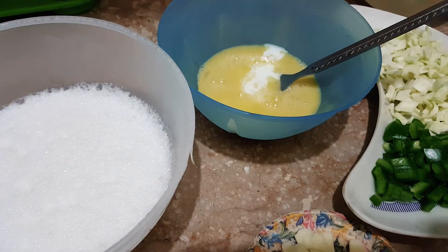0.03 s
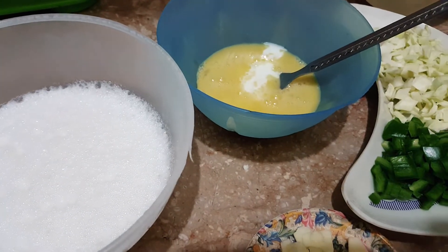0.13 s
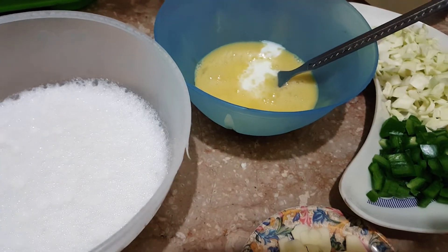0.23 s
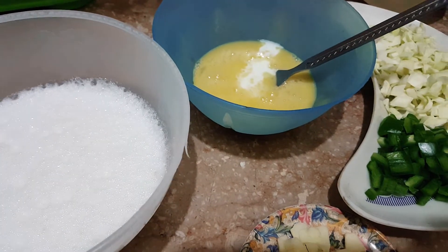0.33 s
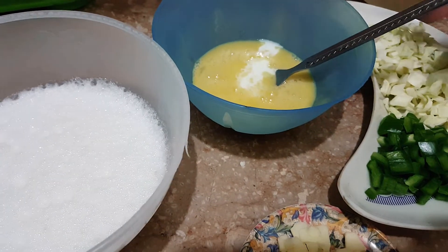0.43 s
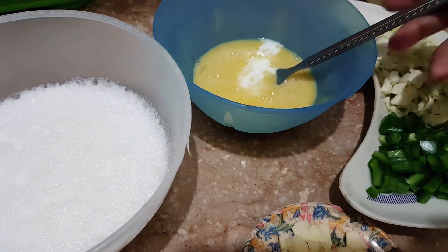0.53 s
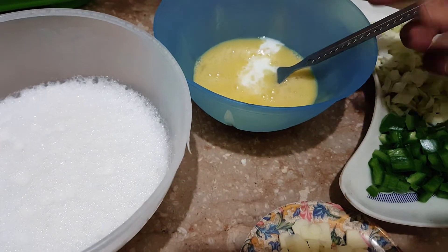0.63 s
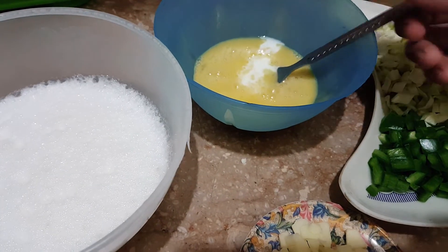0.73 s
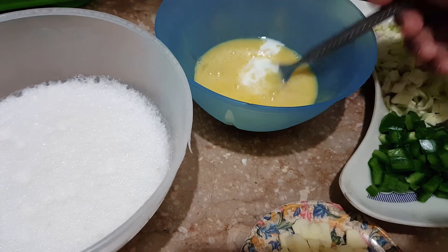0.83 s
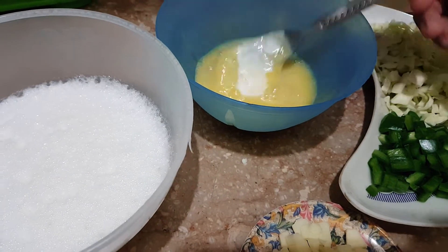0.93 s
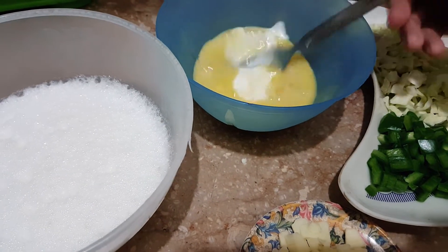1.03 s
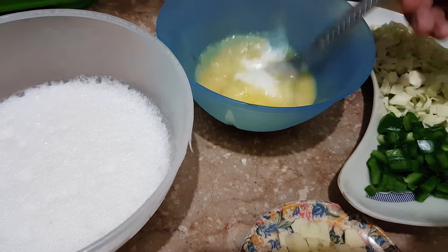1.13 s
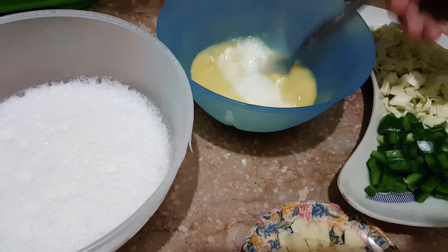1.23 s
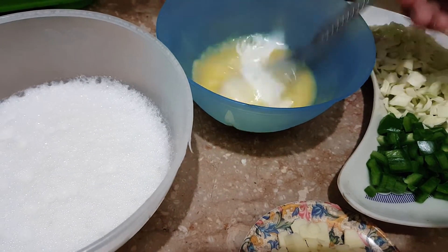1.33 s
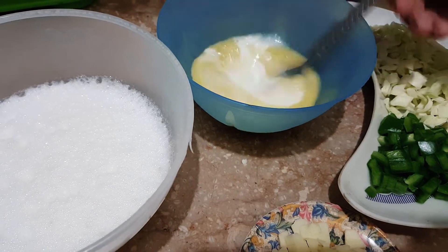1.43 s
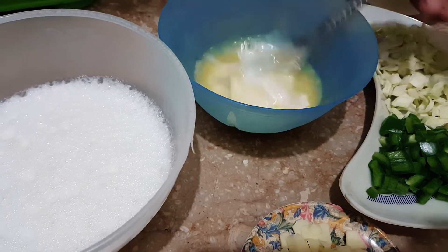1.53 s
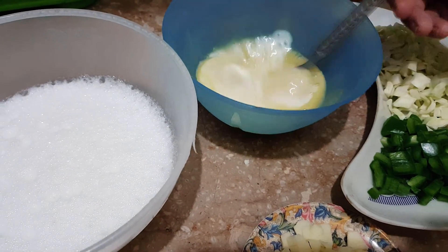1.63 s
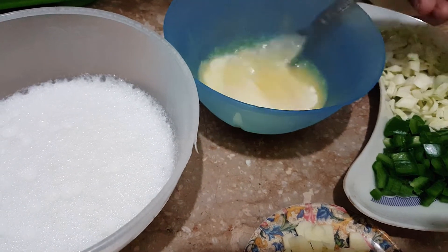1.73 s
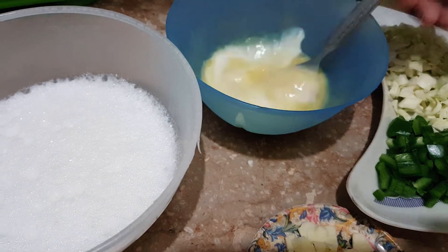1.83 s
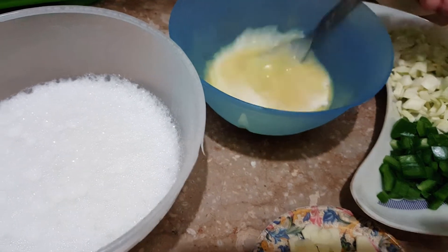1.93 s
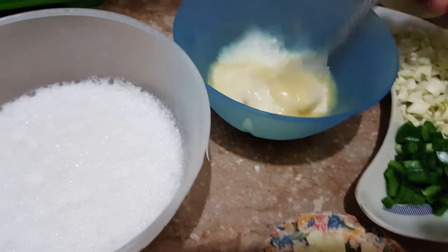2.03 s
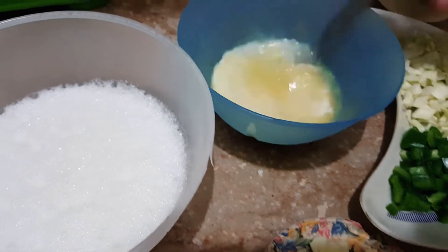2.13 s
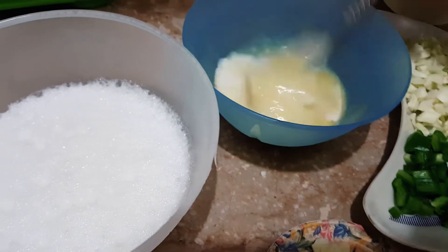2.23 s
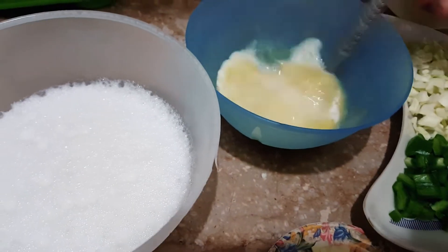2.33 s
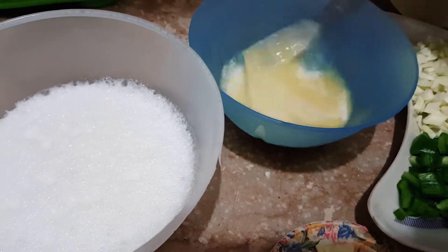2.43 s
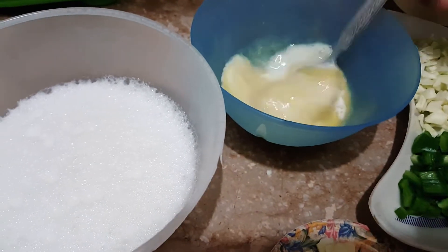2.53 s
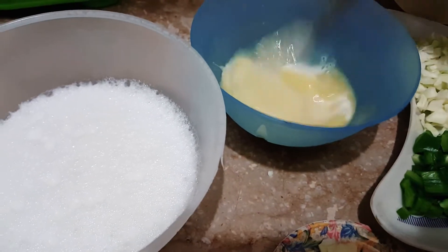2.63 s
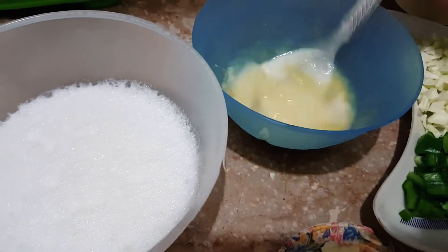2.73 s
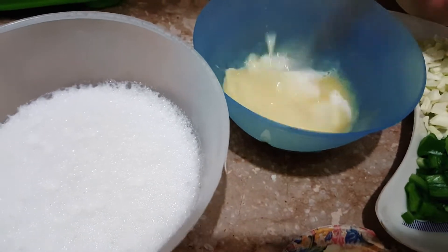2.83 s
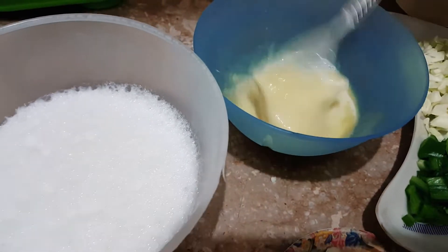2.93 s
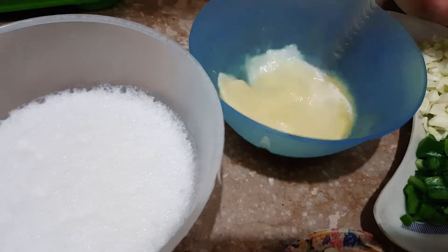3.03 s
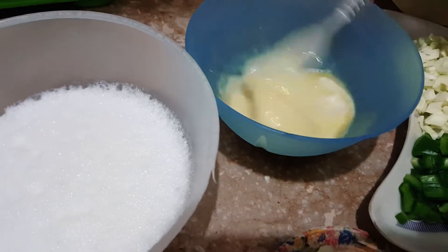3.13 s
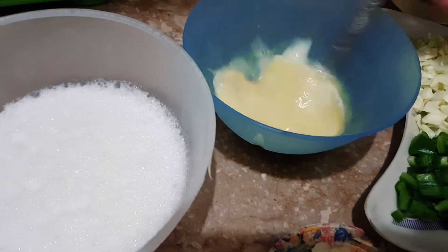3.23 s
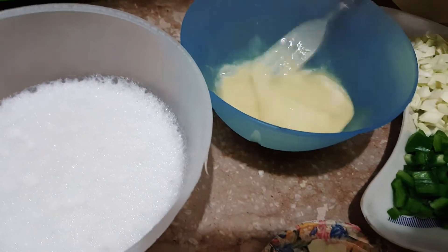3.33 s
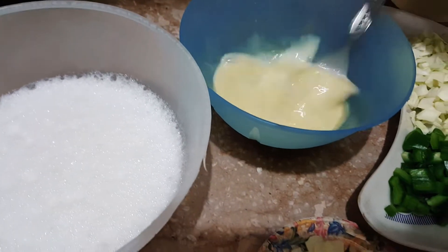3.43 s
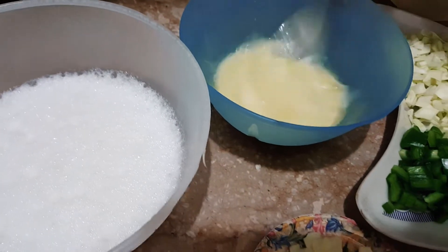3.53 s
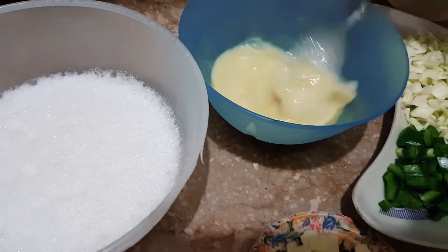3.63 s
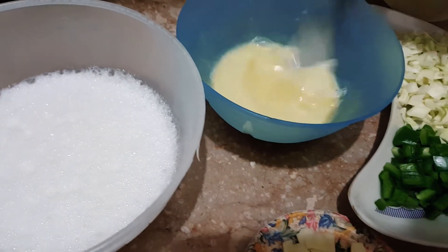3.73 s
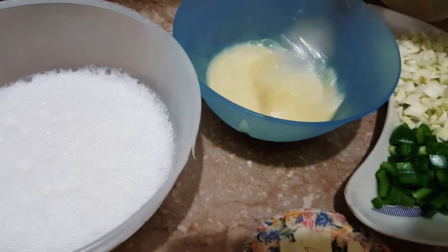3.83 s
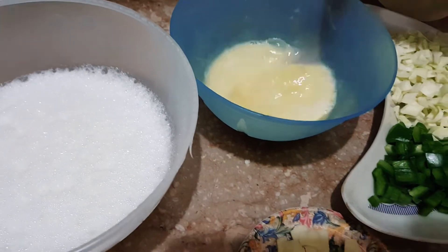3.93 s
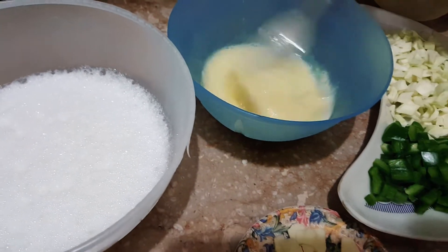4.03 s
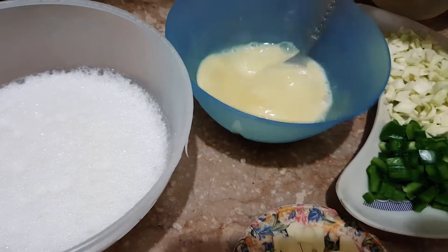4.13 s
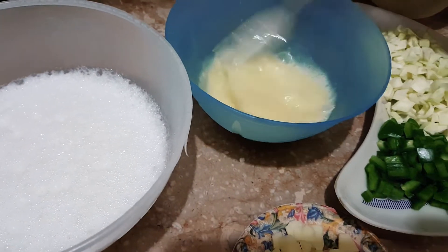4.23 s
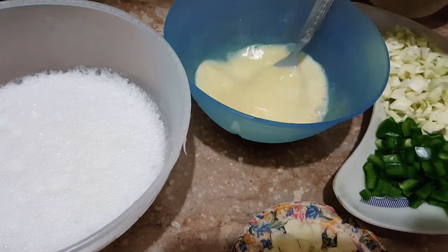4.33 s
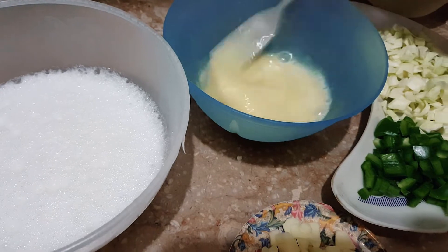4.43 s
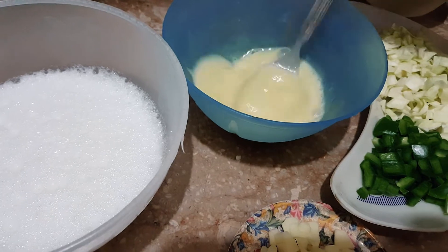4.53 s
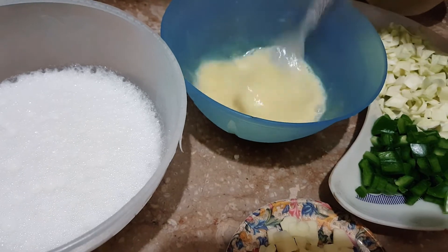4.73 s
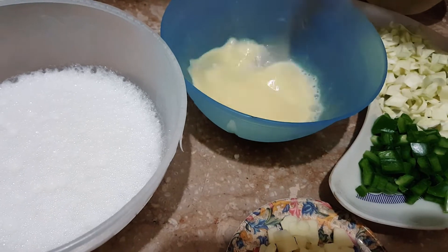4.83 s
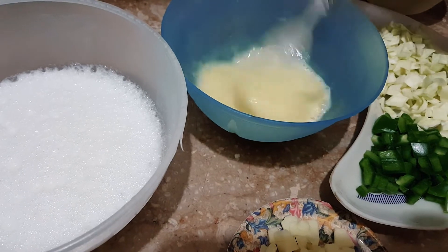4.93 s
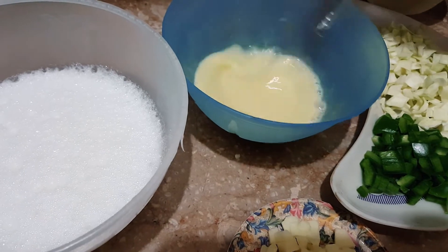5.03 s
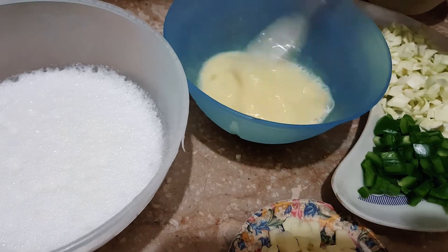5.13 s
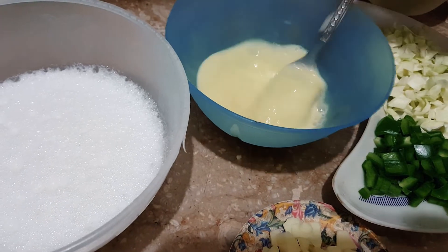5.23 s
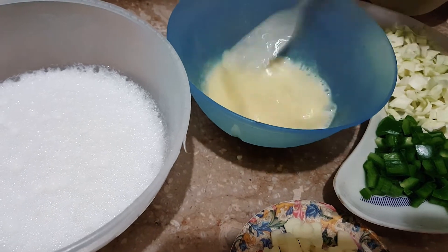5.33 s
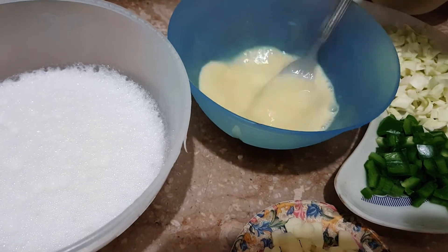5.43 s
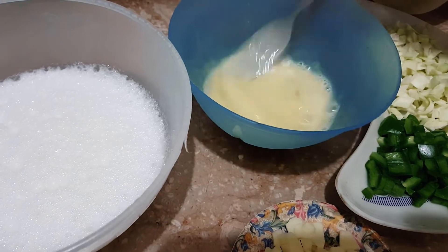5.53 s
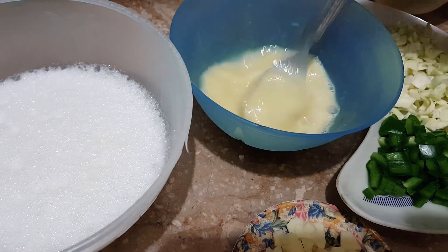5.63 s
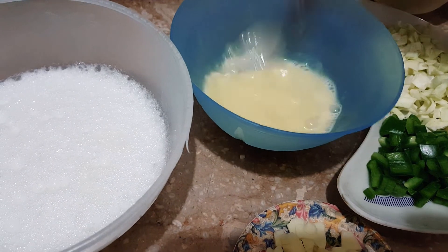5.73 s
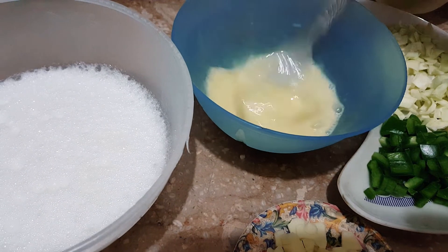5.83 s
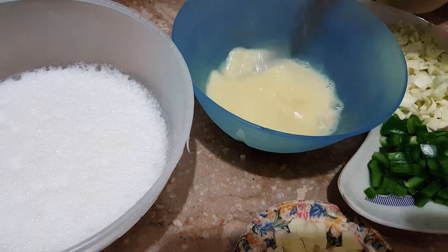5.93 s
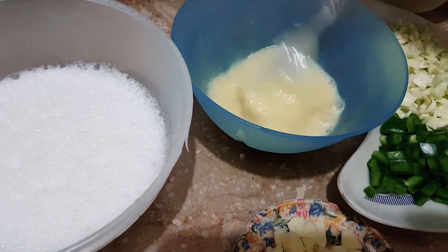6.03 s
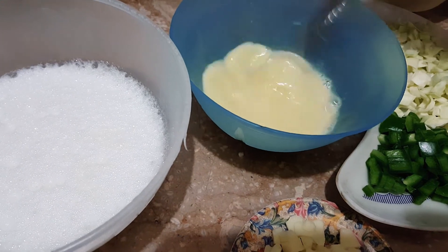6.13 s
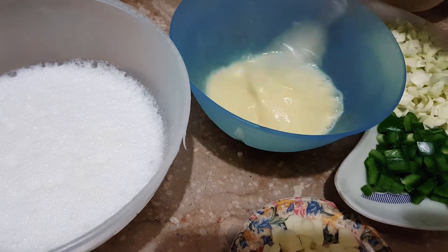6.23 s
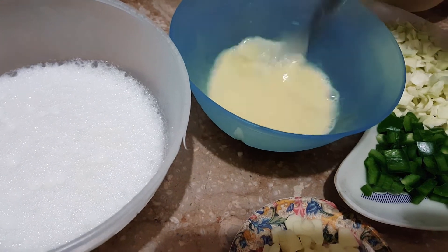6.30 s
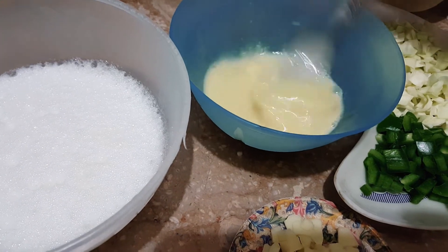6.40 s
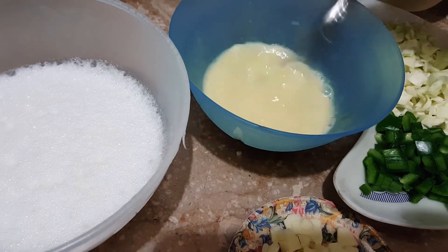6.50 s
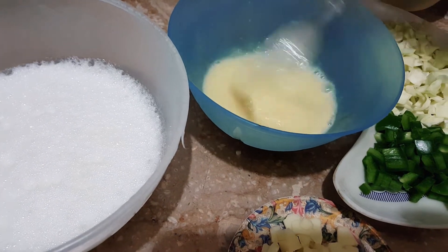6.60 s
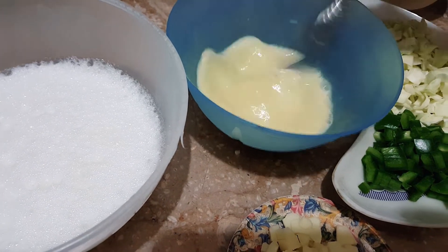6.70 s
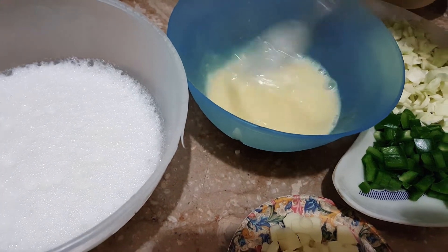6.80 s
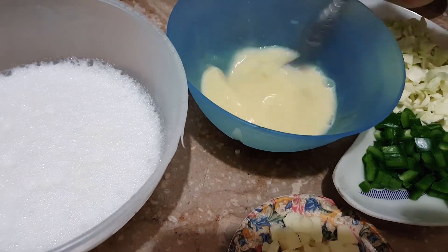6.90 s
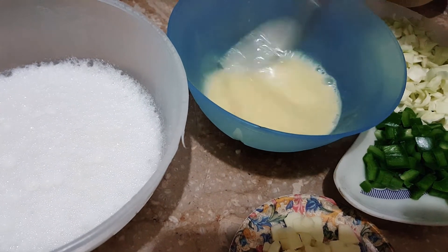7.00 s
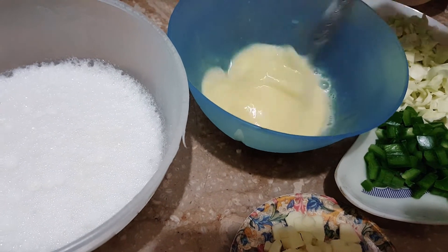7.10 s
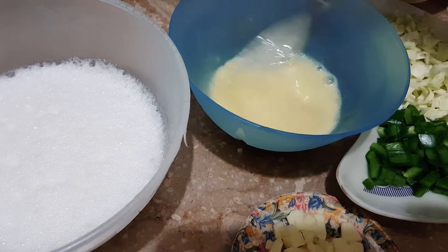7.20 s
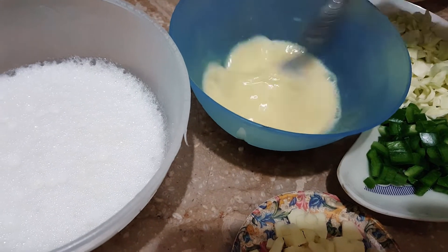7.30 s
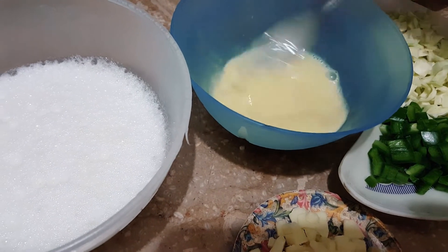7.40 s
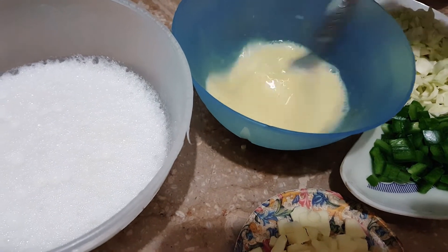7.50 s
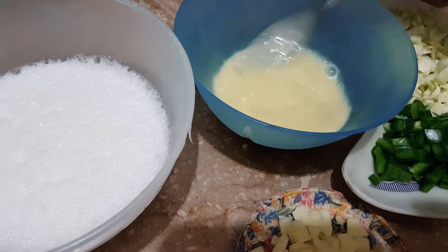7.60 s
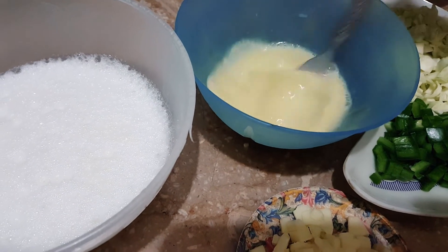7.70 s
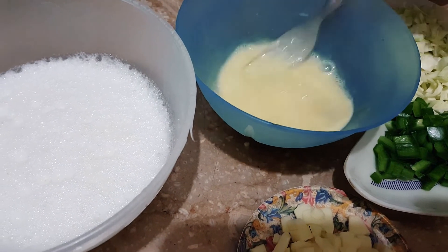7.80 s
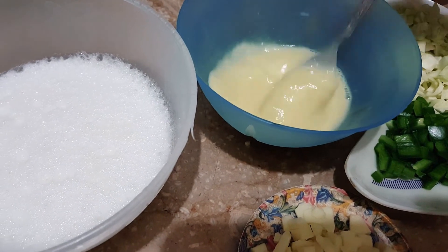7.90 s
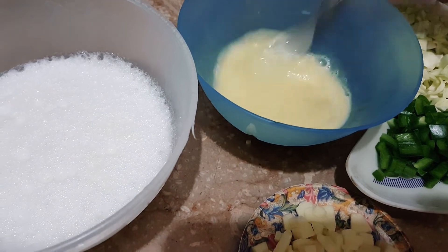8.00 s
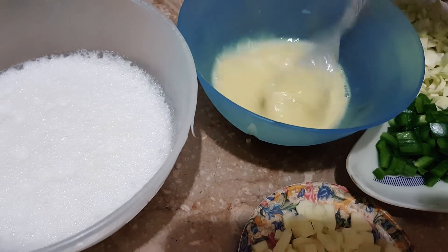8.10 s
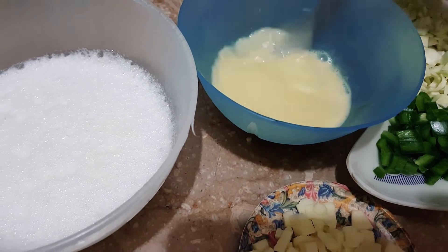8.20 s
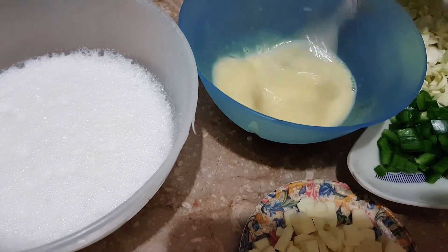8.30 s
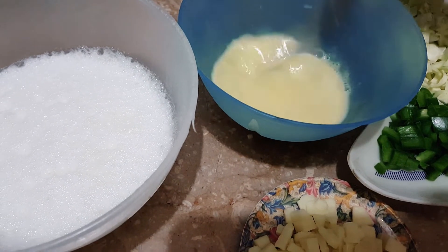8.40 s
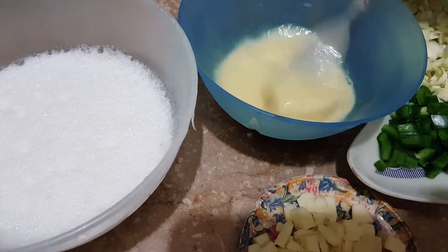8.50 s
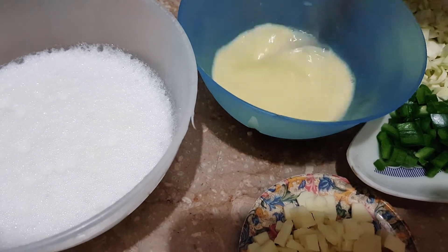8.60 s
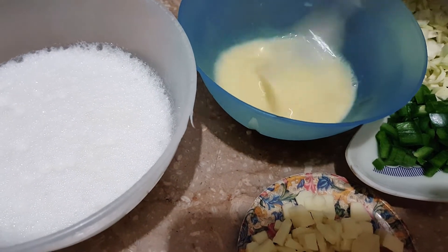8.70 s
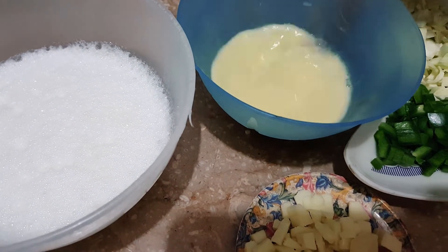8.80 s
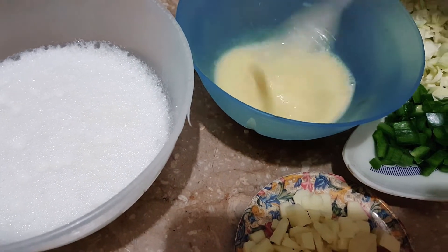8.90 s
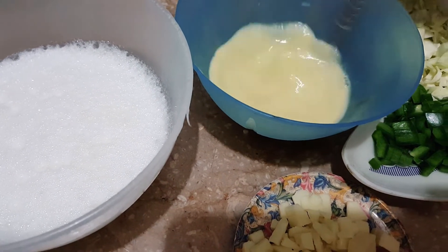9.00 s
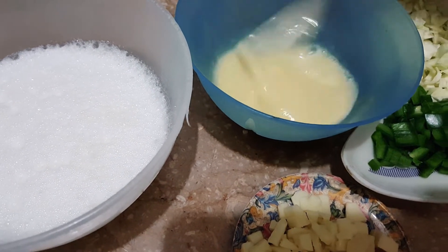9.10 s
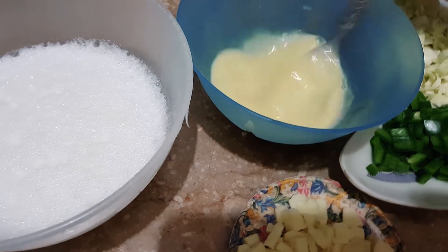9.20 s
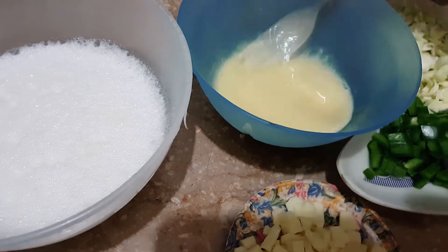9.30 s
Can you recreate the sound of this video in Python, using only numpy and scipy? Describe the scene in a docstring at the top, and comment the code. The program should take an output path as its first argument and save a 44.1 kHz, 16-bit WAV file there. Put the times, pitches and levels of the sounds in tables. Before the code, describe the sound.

Brisk wet whisking of thin batter in a small plastic bowl, with gulping slaps, fork scrapes and fine fizzing froth.

```python
"""Whisking egg and milk with a fork

A fork beats egg and milk in a plastic bowl, five to six strokes a second, close to the microphone.
Each plop is a ringing air pocket with bursts of coloured noise for thud, slap, splash and spray.
Tines cut the liquid or strike the wall, then the hollow gulps shut; froth and swirl are clumped pops.
A dull knock comes before the strokes; the kitchen rings briefly and the loudest plops overload."""
import sys
import numpy as np
from scipy import signal
from scipy.fft import rfft, irfft
from scipy.io import wavfile
from scipy.ndimage import uniform_filter1d

SR = 44100
rng = np.random.default_rng(int(sys.argv[2]) if len(sys.argv) > 2 else 0)


def wav_out(sig):
    """Save sig, one row per channel (or a flat mono array), as 16-bit PCM at SR to the path in sys.argv[1]."""
    wavfile.write(sys.argv[1], SR, np.round(np.clip(np.atleast_2d(sig).T, -1, 1) * 32767).astype(np.int16))


N = 412335  # length [samples]


def amp(db):
    """Decibels to gain."""
    return 10 ** (np.asarray(db) / 20)


def evened(x):
    """Scales to rms 1."""
    return x / np.sqrt(np.mean(x ** 2) + 1e-20)


def unit_blow(x):
    """Scales a short sound to the energy of 10 ms at rms 1."""
    return x / np.sqrt(np.sum(x ** 2) / (SR / 100) + 1e-20)


def read(points, hz):
    """Reads a table on a log-frequency axis."""
    f, value = np.transpose(points)
    return np.interp(np.log(hz + 1), np.log(f + 1), value)


def add(mix, s, sound):
    """Adds a sound into the mix at time s [s]."""
    part = mix[max(round(s * SR), 0):][:len(sound)]
    part += sound[:len(part)]


def coloured(x, spectrum):
    """Filters x by a table of (frequency [Hz], gain [dB])."""
    hz = np.fft.rfftfreq(len(x), 1 / SR)
    return irfft(rfft(x) * amp(read(spectrum, hz)), len(x))


def seconds(size):
    """Time axis [s] of a sound of the given number of samples."""
    return np.arange(size) / SR


def burst(spectrum, rise, decay, grain_db):
    """A short rush of coloured noise in uneven grains; rise and decay are time constants [s]."""
    t = seconds(size=6144)
    grains = amp(grain_db * evened(uniform_filter1d(rng.standard_normal(len(t)), size=30)))
    rush = coloured(rng.standard_normal(len(t)) * grains, spectrum)
    return unit_blow(rush * (1 - np.exp(-t / rise)) * np.exp(-t / decay))


def pocket(hz, rise, cycles, drift, echo, reach, scatter):
    """An air pocket rings for a few cycles as it changes size; others follow from the other tines."""
    t, out = seconds(size=1024), np.zeros(2048)
    later = rng.uniform(0.00145, reach, size=4)  # [s]
    for delay, size in [(0, 1), *zip(later, echo * np.exp(-later / reach))]:
        own_hz = hz * np.exp(scatter * rng.uniform(-0.94, 1) * delay / reach)
        age = own_hz * t / cycles
        pitch = own_hz * np.exp(drift * rng.uniform(-0.94, 1) * (np.tanh(age / 2) - .5))
        tone = np.sin(2 * np.pi * np.cumsum(pitch) / SR)
        add(out, delay, size * tone * (1 - np.exp(-t / rise)) * np.exp(-age))
    return unit_blow(out)


def crackle(level, spectrum, per_s, spread_db, clump_db):
    """Countless small bubbles burst in loose clumps under a slow level curve."""
    sizes = amp(spread_db * np.minimum(rng.exponential(1, N), 4))
    pops = rng.standard_normal(N) * (rng.random(N) < per_s / SR) * sizes
    hz, t, z = signal.stft(coloured(pops, spectrum), SR, nperseg=256)
    # each clump holds bubbles of like size, so it lights a patch of the spectrum
    patches = uniform_filter1d(rng.standard_normal(z.shape), size=14, axis=0)
    clumps = evened(uniform_filter1d(patches, size=12, axis=1))
    fizz = signal.istft(z * amp(clump_db * clumps), SR)[1][:N]
    return evened(fizz) * amp(np.interp(seconds(N), *np.transpose(level)))


# cuts and strikes closer together than this belong to one stroke
STROKE_GAP_S = 0.11


def stroke_starts():
    """The time [s] at which the fork enters the liquid in each stroke."""
    times = np.sort([row[0] for row in CUTS + STRIKES])
    return times[np.diff(times, prepend=0) > STROKE_GAP_S]


def stroke_swell(depth_db, crest):
    """A gain that rises and falls once a stroke, highest at the share crest of the cycle."""
    starts = stroke_starts()
    cycle = np.interp(seconds(N), starts, np.arange(len(starts)))
    return amp(depth_db * np.cos(2 * np.pi * (cycle - crest)))


# slow level curve of the froth's fizz: (time [s], level [dB])
FROTH = [(0.0, -36), (0.23, -39), (0.57, -32), (0.85, -35), (1.2, -31.5), (1.55, -33), (1.85, -36),
         (2.42, -35.5), (2.95, -48), (3.17, -50), (3.55, -28.5), (4.7, -42), (5.05, -30.5), (5.4, -35),
         (6.9, -31), (7.4, -37.5), (8.55, -33), (9.35, -34.5)]
# colour of the fizz: (frequency [Hz], gain [dB])
FIZZ = [(700, -34), (2200, -4), (4500, -1.5), (6500, -2.5), (8200, -16.5), (9200, -8.5), (11300, 0.5),
        (13500, 7), (15000, 1), (16000, -1.5)]


def froth():
    """Bursting froth bubbles fizz and swell a little with each stroke."""
    fizz = crackle(FROTH, FIZZ, per_s=6300, spread_db=-2.5, clump_db=6.0)
    return amp(0.5) * stroke_swell(depth_db=1.5, crest=0.2) * fizz


# slow level curve of the liquid swirling round the bowl: (time [s], level [dB])
SWIRL = [(0.0, -35.5), (0.25, -23), (0.6, -34), (1.9, -23), (3.15, -33), (3.62, -24), (3.9, -32),
         (4.3, -32.5), (6.9, -36), (7.45, -41), (9.35, -41)]
# colour of the swirling liquid: (frequency [Hz], gain [dB])
SWIRL_COLOUR = [(300, -21.5), (1000, -6), (2200, 3.5), (3500, -4), (6000, -8.5), (9000, -28)]


def swirl():
    """Liquid swirls round the bowl as a sparser crackle, swelling later in each stroke."""
    wash = crackle(SWIRL, SWIRL_COLOUR, per_s=3300, spread_db=-2.5, clump_db=5.0)
    return amp(-10.5) * stroke_swell(depth_db=1.5, crest=0.34) * wash


# colour of the kitchen's still air: (frequency [Hz], gain [dB])
AIR = [(20, -34), (70, -14), (130, 9), (220, -7), (370, 12), (600, -16), (1200, 10), (3000, -22),
       (9000, -18)]


def air():
    """The still air of the kitchen is a steady bed of coloured noise."""
    return amp(-53) * evened(coloured(rng.standard_normal(N), AIR))


# a dull knock and two fainter repeats of it: (time [s], level [dB])
KNOCKS = [(0.058, -10.5), (.167, -22), (0.204, -31)]
# colour of the knock's clatter: (frequency [Hz], gain [dB])
KNOCK_COLOUR = [(200, -32), (400, -19), (700, -3), (1000, 2), (1400, 3), (1700, 3), (2050, -2), (2350, -4),
                (2700, -20), (4000, -46)]
# a light, bright tap after the last of them
TAP_S, TAP_DB = 0.282, -17


def knocks():
    """Each soft blow is a brief ring, then a dull clatter; a light tap follows the last."""
    out = np.zeros(N)
    add(out, TAP_S, amp(TAP_DB) * burst(SPLASH, rise=0.00033, decay=0.0048, grain_db=-1.5))
    for s, db in KNOCKS:
        ring = pocket(hz=2030, rise=.005, cycles=4.5, drift=.04, echo=.6, reach=.005, scatter=.08)
        clatter = burst(KNOCK_COLOUR, rise=.004, decay=.018, grain_db=2)
        add(out, s, amp(db + 3) * ring)
        add(out, s + 0.0019, amp(db - 1) * clatter)
    return out


# single bubbles that pop between the plops: (time [s], pitch [Hz], level [dB])
BUBBLES = [(0.393, 4400, -37), (1.385, 6300, -25.5), (2.016, 2230, -30), (2.722, 1050, -21),
           (2.816, 5500, -31), (4.071, 4670, -30), (5.136, 6000, -23), (5.215, 1820, -31),
           (5.953, 2390, -32.5), (6.188, 1250, -23.5), (6.799, 5900, -25), (9.165, 1840, -28)]
# sticky films of egg that snap with a fine sizzle: (time [s], level [dB])
SIZZLES = [(0.399, -26), (0.542, -30), (0.956, -20), (1.385, -13.5), (1.582, -26), (1.873, -26),
           (2.447, -25), (3.22, -23), (3.23, -14.5), (3.235, -22), (7.063, -13), (7.762, -27.5),
           (8.794, -15)]
# fainter sizzles at random times
FAINT_SIZZLES_PER_S, FAINT_SIZZLE_DB = 1.5, -25.5
# faint pitched blips at random times after the strokes: how many, how late at most, pitches, level
BLIPS_PER_STROKE, BLIP_LAG_S = 0.56, 0.091
BLIP_LOW_HZ, BLIP_HIGH_HZ, BLIP_DB = 1600, 6420, -31.5


def small_pops():
    """Single bubbles ring as air pockets, films sizzle as bright noise; random faint blips join in."""
    out, starts = np.zeros(N), stroke_starts()
    for s, hz, db in BUBBLES:
        pop = pocket(hz, rise=0.0013, cycles=1.6, drift=0.3, echo=1.0, reach=0.012, scatter=0.41)
        add(out, s, amp(db + 4.5) * pop)
    for s, db in SIZZLES:
        add(out, s, amp(db) * burst(SPRAY, rise=0.00034, decay=0.01, grain_db=4.5))
    for s in rng.uniform(0, N / SR, round(FAINT_SIZZLES_PER_S * N / SR)):
        add(out, s, amp(FAINT_SIZZLE_DB) * burst(SPRAY, rise=.001, decay=0.0099, grain_db=-1.0))
    for stroke, lateness, pitch in rng.random((round(BLIPS_PER_STROKE * len(starts)), 3)):
        hz = np.interp(pitch, [0, 1], [BLIP_LOW_HZ, BLIP_HIGH_HZ])
        blip = pocket(hz, rise=0.001, cycles=6.7, drift=0.83, echo=0.78, reach=0.0059, scatter=0.15)
        s = starts[int(stroke * len(starts))] + BLIP_LAG_S * lateness
        add(out, s, amp(BLIP_DB) * blip)
    return out


# the tines cut into the liquid and open a stroke:
# (time [s], air pocket pitch [Hz], pocket level [dB], spray level [dB])
CUTS = [(0.747, 3470, -23, -46), (1.074, 2450, -14.5, -23.5), (1.292, 2810, -18, -38),
        (1.486, 2850, -18.5, -38), (1.651, 2930, -8.5, -22), (1.83, 2620, -8, -26), (1.995, 2830, -21, -31),
        (2.182, 2560, -5.5, -22.5), (2.484, 2420, -15.5, -29), (3.069, 2610, -12.5, -20),
        (3.241, 2470, -8, -14), (3.263, 2550, -16, -24), (3.972, 2620, -9.5, -22.5),
        (4.162, 2630, -17, -22), (4.687, 3540, -11.5, -11), (4.702, 2670, -10, -13.5),
        (4.882, 2520, -10.5, -13.5), (5.244, 1920, -17.5, -19), (5.435, 2770, -11, -25),
        (5.618, 2690, -11, -25.5), (5.778, 2900, -13, -14.5), (5.785, 3400, -18, -29),
        (5.805, 2820, -18, -14.5), (5.988, 4100, -23.5, -20.5), (6.173, 2930, -8, -21),
        (6.351, 2330, -6, -12.5), (6.726, 2430, -6, -20), (6.902, 3520, -8, -16.5),
        (6.923, 3010, -10.5, -17), (7.085, 3580, -11, -20), (7.111, 3840, -15, -16),
        (7.294, 3500, -10.5, -37), (7.322, 3430, -16, -26), (7.501, 3160, -13.5, -17),
        (7.696, 2370, -11, -26), (7.871, 3030, -8, -15), (8.064, 2780, -19.5, -25),
        (8.255, 2620, -9, -20.5), (8.458, 2540, -15, -16), (8.64, 2780, -15.5, -18.5),
        (8.833, 2690, -6, -15), (9.201, 2830, -9, -15.5)]
# in hard strokes the fork drives through to the bowl's wall:
# (time [s], air pocket pitch [Hz], pocket level [dB], slap on the wall level [dB], spray level [dB])
STRIKES = [(1.626, 1110, -31, -26.5, -31), (1.663, 1220, -12.5, -14, -29), (2.159, 940, -20.5, -32, -42),
           (2.339, 1126, -10, -14.5, -16.5), (2.507, 1150, -9, -2, -18), (2.681, 3350, -12, -17, -9),
           (2.705, 2200, -16, -16.5, -14), (2.866, 800, -12, -22.5, -14.5), (3.049, 825, -23, -56, -25),
           (3.408, 2370, -26, -17, -20), (3.416, 2420, -6.5, -8.5, -14.5), (3.585, 3460, -11.5, -11.5, -32),
           (3.761, 3620, -5.5, -14.5, -14), (4.305, 1240, -7, -4, -25), (4.337, 860, -15.5, -11, -49),
           (4.508, 1270, -11, -7, -8.5), (4.527, 2850, -4, -15, -18.5), (5.044, 1170, -5.5, -6, -12.5),
           (5.054, 2830, -8.5, -13, -16.5), (6.528, 2340, -8.5, -15.5, -17.5), (8.99, 1440, -15, -34, -51),
           (9.017, 2700, -9, -16, -15)]
# the hollow behind the fork gulps shut, mostly some 40 ms after it enters:
# (time [s], air pocket pitch [Hz], pocket level [dB], thud of the base level [dB])
GULPS = [(1.316, 2490, -24, -37), (1.501, 2520, -13, -35), (1.693, 720, -18, -26), (1.938, 1660, -19, -61),
         (2.059, 1880, -34, -45.5), (2.23, 1970, -14, -29), (2.358, 2900, -11.5, -24),
         (2.4, 2180, -12.5, -22.5), (2.527, 1080, -30, -21), (2.545, 1210, -25, -23),
         (2.573, 2080, -8.5, -22.5), (2.744, 1940, -4.5, -20.5), (2.902, 3780, -26, -28),
         (2.917, 1020, -13.5, -27.5), (3.101, 2340, -9.5, -27), (3.427, 2500, -7.5, -18),
         (3.604, 2200, -2.5, -27), (3.649, 2270, -7, -30.5), (3.803, 2550, -14.5, -37.5),
         (4.008, 2170, -3.5, -30.5), (4.192, 2250, -3, -19), (4.352, 2160, -15, -19),
         (4.379, 2350, -6, -22.5), (4.567, 2090, -12.5, -25), (4.743, 2250, -7, -28),
         (4.929, 4430, -16, -34.5), (5.102, 1150, -14.5, -23), (5.274, 2080, -7.5, -23),
         (5.466, 1900, -7, -26.5), (5.648, 2250, -10, -26.5), (5.833, 2210, -10.5, -30.5),
         (6.02, 1736, -5.5, -31), (6.215, 1960, -12, -24.5), (6.408, 2470, -22, -35),
         (6.578, 2100, -16, -26.5), (6.766, 2220, -6.5, -16), (6.958, 2040, -11.5, -27.5),
         (7.135, 2120, -11, -29), (7.542, 2090, -9.5, -29), (7.737, 2090, -10.5, -35),
         (7.925, 2080, -17, -34.5), (8.101, 2200, -17, -32.5), (8.299, 2110, -7.5, -28.5),
         (8.39, 1920, -25, -69), (8.482, 2110, -13, -25), (8.673, 2224, -1, -25), (8.868, 2140, -10, -31),
         (9.063, 2020, -7.5, -25.5)]
# make-up of each kind of plop: dB against the level that drives the part
CUT_SPLASH_DB, CUT_SLAP_DB, CUT_THUD_DB = -5.5, -15, -22.5
STRIKE_SPLASH_DB, STRIKE_THUD_DB = -1.5, -19.5
GULP_SPLASH_DB, GULP_SPRAY_DB, GULP_SLAP_DB = -6.5, -15.5, 8
# a gulp's splash grows more slowly than its force [dB per dB]
GULP_SPLASH_GROWTH = 0.76


def plops():
    """Bright cuts, hard strikes, deep gulps: (s, Hz, dB of pocket, thud, slap, splash, spray)."""
    for s, hz, pocket_db, spray_db in CUTS:
        force_db = (pocket_db + spray_db) / 2
        thud_db, slap_db = force_db + CUT_THUD_DB, force_db + CUT_SLAP_DB
        yield s, hz, pocket_db, thud_db, slap_db, force_db + CUT_SPLASH_DB, spray_db
    for s, hz, pocket_db, slap_db, spray_db in STRIKES:
        force_db = np.mean([pocket_db, slap_db, spray_db])
        thud_db, splash_db = force_db + STRIKE_THUD_DB, force_db + STRIKE_SPLASH_DB
        yield s, hz, pocket_db, thud_db, slap_db, splash_db, spray_db
    for s, hz, pocket_db, thud_db in GULPS:
        wet_db = GULP_SPLASH_GROWTH * (pocket_db + thud_db) / 2
        splash_db, spray_db = wet_db + GULP_SPLASH_DB, wet_db + GULP_SPRAY_DB
        yield s, hz, pocket_db, thud_db, thud_db + GULP_SLAP_DB, splash_db, spray_db


# colours of the parts of a plop, from base to treble: (frequency [Hz], gain [dB])
THUD = [(25, -15), (65, -7), (105, -5), (145, -8.5), (330, 6.5), (550, 0.5), (900, 2.5), (2000, -52)]
SLAP = [(250, -29), (550, -12), (900, 2), (1300, 3), (1900, -3.5), (3000, -15), (7000, -67)]
SPLASH = [(900, -42), (1800, 4.5), (2800, 6), (4000, 6), (5000, -2), (6700, -10), (9000, -19), (14000, -37)]
SPRAY = [(3000, -61), (6000, -1.5), (9000, -4), (11300, 9), (12500, 6), (14500, 12.5), (16000, 3.5)]


def whisking():
    """Each plop is a ringing air pocket with thud and slap of the bowl, splash and spray."""
    out = np.zeros(N)
    for s, hz, pocket_db, thud_db, slap_db, splash_db, spray_db in plops():
        ring = pocket(hz, rise=0.0012, cycles=2.1, drift=0.16, echo=1.09, reach=.008, scatter=0.27)
        add(out, s - .0004, amp(pocket_db - 2.5) * ring)
        # the bowl's base and wall answer with a slower rise
        add(out, s, amp(thud_db - 5.5) * burst(THUD, rise=0.0039, decay=0.022, grain_db=1))
        add(out, s, amp(slap_db - 3.0) * burst(SLAP, rise=0.0021, decay=0.0087, grain_db=2.0))
        splash = burst(SPLASH, rise=0.00055, decay=0.0071, grain_db=1.5)
        add(out, s - .0003, amp(splash_db + 2.0) * splash)
        spray = burst(SPRAY, rise=0.00015, decay=0.0027, grain_db=3.5)
        add(out, s - .0003, amp(spray_db + 1.2) * spray)
        # the tines hiss through the surface just before it tears
        hiss = burst(FIZZ, rise=0.0044, decay=0.003, grain_db=0)
        add(out, s - .006, amp(spray_db - 16) * hiss)
        # the torn liquid sloshes shut and its fresh froth fizzes
        slosh = burst(SWIRL_COLOUR, rise=0.0031, decay=0.022, grain_db=1)
        add(out, s + 0.0075, amp(splash_db - 17.5) * slosh)
        fresh_froth = burst(FIZZ, rise=0.0027, decay=0.04, grain_db=12.5)
        add(out, s + 0.0058, amp(spray_db - 13.5) * fresh_froth)
    return out


# resonances of the bowl with the liquid in it: (frequency [Hz], width [Hz], gain [dB])
BOWL = [(141, 16, 8), (173, 16, 8), (217, 20, 2), (366, 70, -4), (433, 24, -1), (650, 80, -5),
        (990, 110, -5), (1260, 120, -3), (2020, 140, -9), (2270, 160, -7), (3780, 220, -9)]


def bowl(x):
    """The bowl adds its resonances, a bank of parallel peaks, to the plops in it."""
    out = x.copy()
    for hz, width, db in BOWL:
        out += amp(db) * signal.lfilter(*signal.iirpeak(hz, hz / width, SR), x)
    return out


# colour of the tines scraping the wall: (frequency [Hz], gain [dB])
SCRAPE = [(800, -18), (2000, -10), (3500, 3.5), (6000, -2.5), (7500, -13.5), (10000, -11.5), (15000, -10)]
# the hand takes up the fork
PICK_UP_S, PICK_UP_DB = 0.747, -27


def scrapes():
    """A rough, fading scrape of grainy noise: as the fork is taken up, then after each strike."""
    out = np.zeros(N)
    pick_up = burst(SPLASH, rise=0.0034, decay=0.036, grain_db=2)
    add(out, PICK_UP_S, amp(PICK_UP_DB) * pick_up)
    for s, _, pocket_db, slap_db, _ in STRIKES:
        scrape = burst(SCRAPE, rise=0.012, decay=0.026, grain_db=9)
        add(out, s + 0.0091, amp((pocket_db + slap_db) / 2 - 15) * scrape)
    return out


def trailing_ticks(per_s, lag, level_db, spread_db):
    """A random scatter of faint, short decaying sines trails each plop."""
    out, t = np.zeros(N), seconds(size=500)
    for s, *_, splash_db, _ in plops():
        for delay, pitch, strength in rng.random((rng.poisson(per_s * lag), 3)):
            cycles = np.interp(pitch, [0, 1], [1200, 6500]) * t  # pitch range [Hz]
            tick = np.sin(2 * np.pi * cycles) * (1 - np.exp(-cycles)) * np.exp(-cycles / 2)
            tick_db = level_db + splash_db / 2 + spread_db * strength ** 2
            add(out, s + .01 + lag * delay ** 2, amp(tick_db) * tick)
    return out


# the fork shoves the bowl against the counter: (time [s], level [dB])
BUMPS = [(1.663, -16), (1.694, -13), (1.711, -17), (1.735, -33.5)]
# colour of the bump: (frequency [Hz], gain [dB])
BUMP_COLOUR = [(25, -28.5), (65, -14), (105, -26), (140, 12), (175, -7), (220, -10), (400, -2), (800, -11),
               (1300, -32), (2500, -58)]


def bumps():
    """The bowl's base thuds against the counter and booms on the bowl's two lowest resonances."""
    out, t = np.zeros(N), seconds(size=6000)
    boom = sum(np.sin(2 * np.pi * hz * t) * np.exp(-np.pi * width * t) for hz, width, _ in BOWL[:2])
    for s, db in BUMPS:
        add(out, s, amp(db - 6) * burst(BUMP_COLOUR, rise=.002, decay=0.018, grain_db=2.5))
        add(out, s, amp(db - 4.5) * unit_blow(boom))
        add(out, s, amp(db + 1.0) * burst(THUD, rise=0.0016, decay=0.016, grain_db=2))
    return out


# ring of the kitchen: (frequency [Hz], time to fall 60 dB [s])
KITCHEN = [(100, 0.42), (500, 0.31), (1400, 0.3), (2500, 0.28), (5000, 0.34), (12000, 0.38)]


def kitchen(x, onset):
    """Dense reflections, each band dying at its own speed; they build up over onset [s]."""
    taps = rng.standard_normal(SR) * (rng.random(SR) < .15)
    hz, t, z = signal.stft(taps, SR, nperseg=256)
    decay = amp(-60 * t / read(KITCHEN, hz)[:, None])
    tail = signal.istft(z * decay, SR)[1]
    tail *= 1 - np.exp(-(seconds(len(tail)) / onset) ** 2)
    return signal.fftconvolve(x, tail / np.linalg.norm(tail))[:N]


def scene():
    """Whisking, froth and the knock in a small kitchen."""
    ticks = trailing_ticks(per_s=30, lag=0.17, level_db=-13.0, spread_db=5.0)
    beaten = bowl(whisking()) + scrapes() + bumps() + small_pops() + ticks
    knock = knocks()
    sent = amp(-7.5) * beaten + amp(-4.0) * knock
    # two room tails trade places slowly, so the ring does not repeat from stroke to stroke
    turn = 2 * np.pi * 0.697 * seconds(N)
    room = sum(kitchen(sent * share, onset=0.005) for share in (np.cos(turn), np.sin(turn)))
    return (beaten + knock + froth() + swirl() + air() + room)[None]


# the microphone port has a notch in the treble: (frequency [Hz], gain [dB])
MICROPHONE = [(20, -5.5), (6800, -1.5), (7600, -3.5), (8250, -6.5), (8800, 1), (10000, -2), (16000, -6.5)]
EDGE_HZ = 15900  # upper band limit


def record(dry):
    """Microphone colour, overload on the loudest plops, and the band limit."""
    heard = coloured(dry[0], MICROPHONE)
    clipped = np.clip(heard, -1, 1)
    lowpass = signal.firwin(255, EDGE_HZ, window=("kaiser", 8), fs=SR)
    return signal.oaconvolve(clipped, lowpass, "same")[None]


dry = scene()
out = record(dry)
wav_out(out)
```